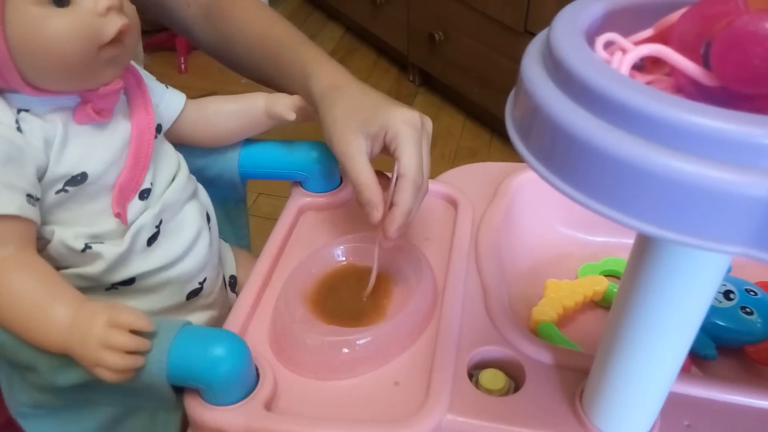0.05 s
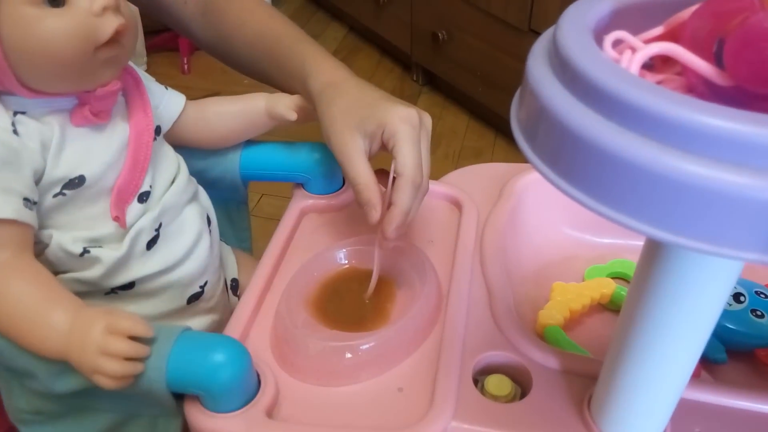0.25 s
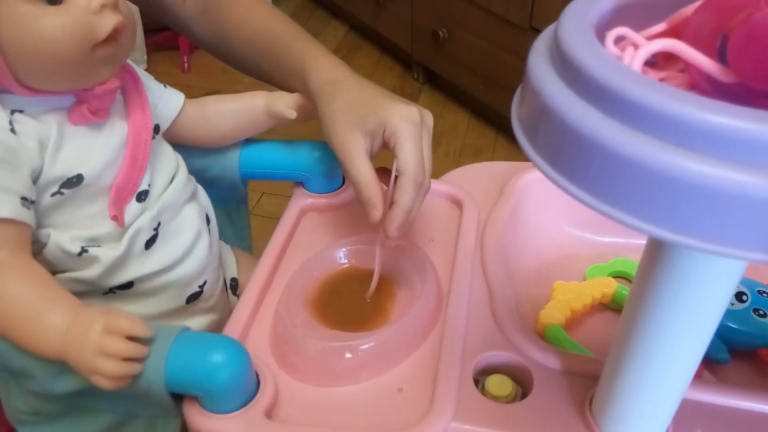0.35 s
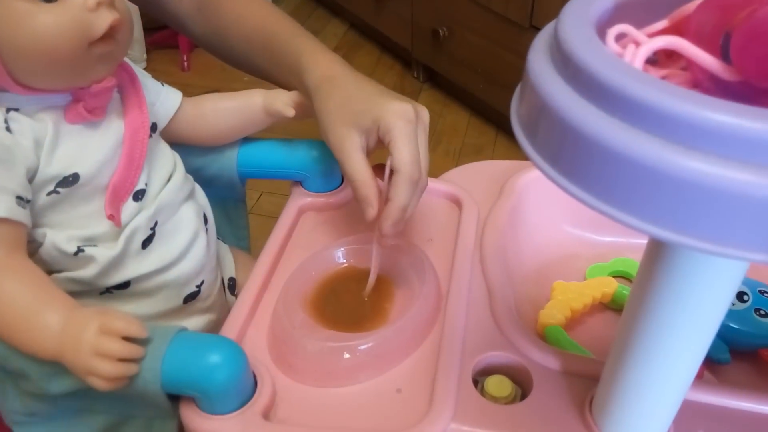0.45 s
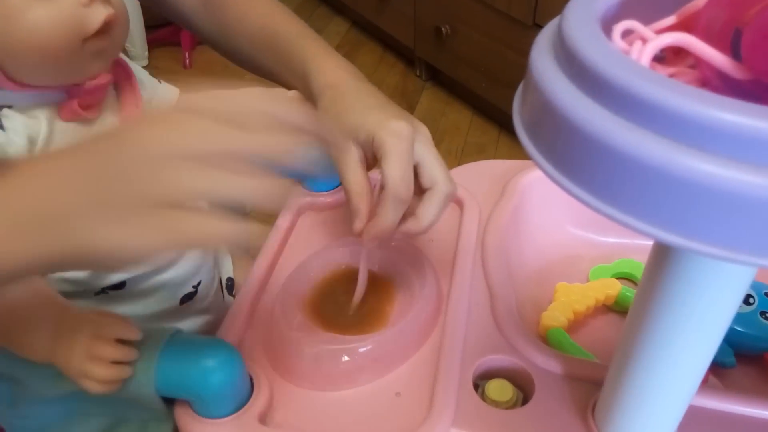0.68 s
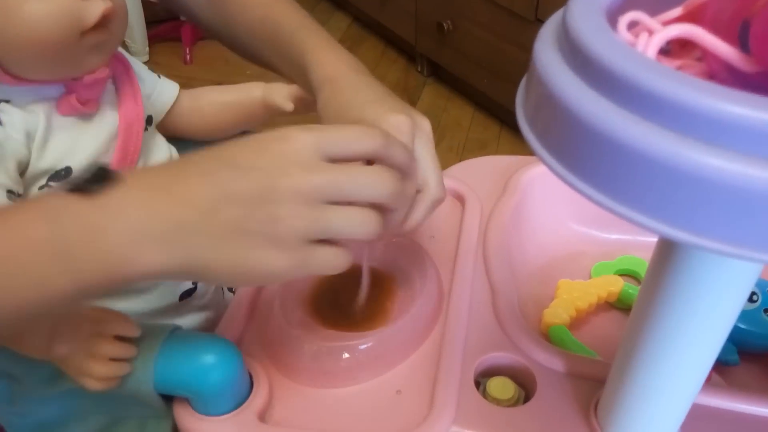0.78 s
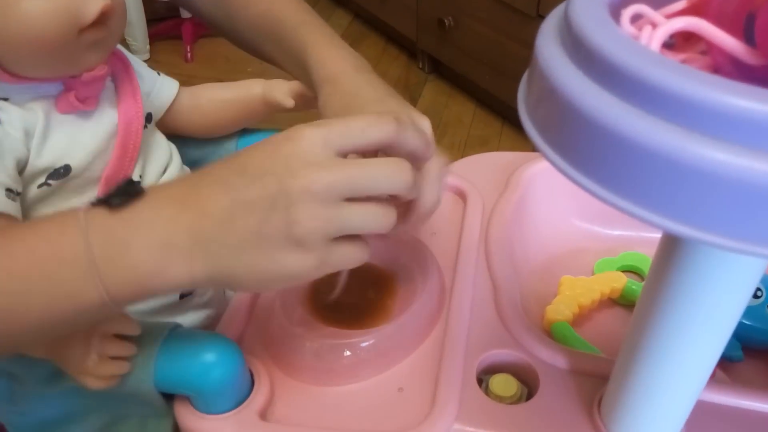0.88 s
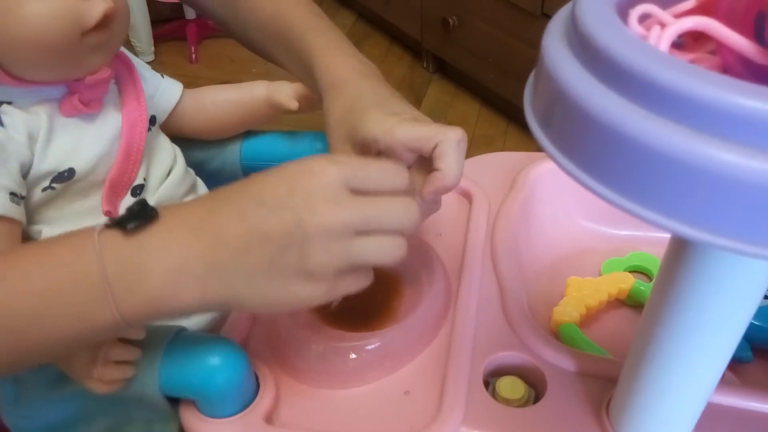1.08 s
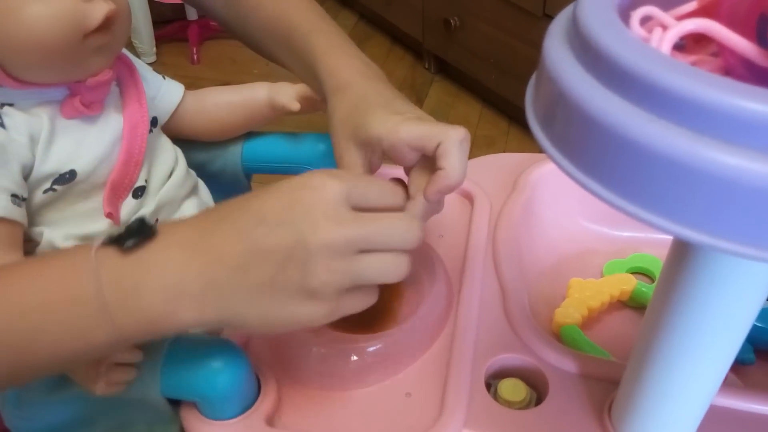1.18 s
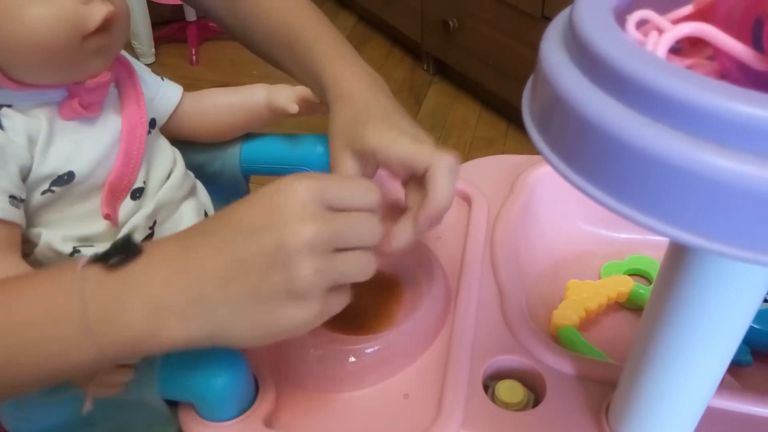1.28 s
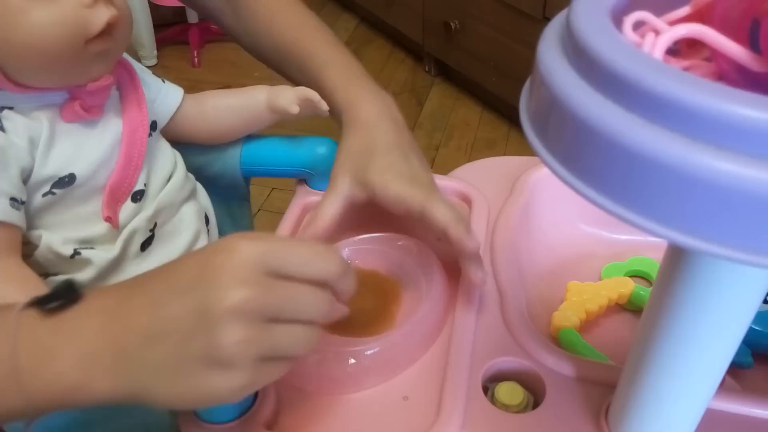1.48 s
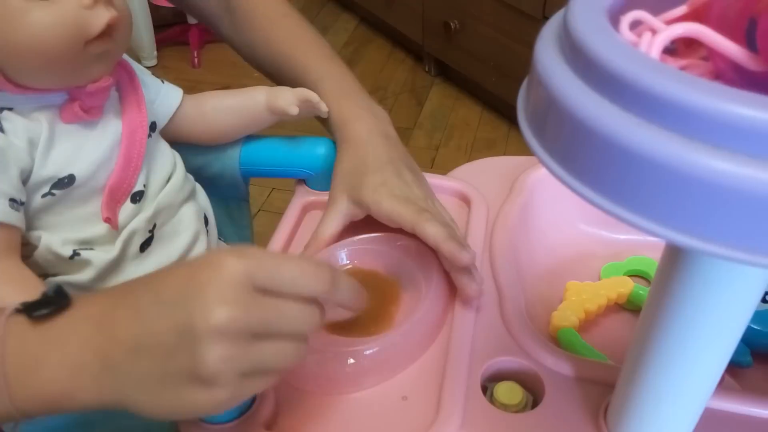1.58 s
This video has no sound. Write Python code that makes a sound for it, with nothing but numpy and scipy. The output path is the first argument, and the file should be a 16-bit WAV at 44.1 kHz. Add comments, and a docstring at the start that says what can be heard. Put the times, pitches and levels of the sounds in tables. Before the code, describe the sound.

A plastic spoon knocks in a small plastic bowl on a hollow toy table. After quiet room tone, a loud dull bump lands at 0.23 seconds, a sharp bright clack at 0.37, then weak taps around 0.5 to 0.65 and faint scrapes until 1.0. A soft microphone touch thuds left at 1.13; faint knocks and a slip follow from 1.34 to 1.65. Short room reverberation, low handling rumble, wavering hiss, thin whine.

```python
"""A plastic spoon is worked in a small plastic bowl in the tray of a hollow toy table, in a living room.
A dull bump and a sharp clack come first, then lighter knocks: damped thuds, noise cracks, ringing modes.
Soft scrapes are dense random slips that hiss and excite the bowl; a noise tail makes the room.
The hand-held microphone adds noise rumble and a touch on its left port, made of four short thuds.
Behind lie room tone, a wavering treble hiss and a thin electronic whine."""
import sys
import numpy as np
from scipy import signal
from scipy.fft import rfft, irfft
from scipy.io import wavfile

SR = 44100
rng = np.random.default_rng(int(sys.argv[2]) if len(sys.argv) > 2 else 0)


def int16_out(signal):
    """Quantize to a 16-bit WAV file."""
    q = np.round(np.clip(np.atleast_2d(signal).T, -1, 1) * 32767)
    wavfile.write(sys.argv[1], SR, q.astype(np.int16))


N = 72765
T = np.arange(N) / SR

# Room tone colour: pitch_hz, density_db (per Hz, relative)
ROOM_TONE_COLOUR = [(25, -5), (70, -5.5), (200, -5.5), (400, -13), (900, -21), (3500, -25), (4800, -24),
                    (5800, -20.5), (7000, -25.5), (8200, -35), (15000, -32.5)]
ROOM_TONE_DB, LOW_NOISE_PAN_DB = -63.5, -6   # the pan is shared with the handling rumble
# Treble hiss colour: pitch_hz, density_db (per Hz, relative)
AIR_HISS_COLOUR = [(2000, -19.5), (4000, -12), (4700, -2), (5200, -5.5), (6300, -1.5), (7200, -8.5),
                   (8000, -23.5), (12000, -36)]
# Treble hiss level over time: time_s, level_db
AIR_HISS_LEVEL = [(0, -66.5), (.12, -65.5), (.2, -69.5), (.33, -62), (.55, -80), (.7, -65.5), (.85, -70.5),
                  (1.05, -82.5), (1.3, -109.5), (1.65, -78)]
WHINE_HZ, WHINE_WANDER_HZ = 5642, 36.2
WHINE_DB, WHINE_OCTAVE_DB, WHINE_PAN_DB = -75, -82.5, -26.5

# Handling rumble colour: pitch_hz, density_db (per Hz, relative)
RUMBLE_COLOUR = [(25, -9.5), (60, 7), (110, 5.5), (200, -9), (500, -46.5), (2000, -59)]
# Handling rumble level over time: time_s, level_db
RUMBLE_LEVEL = [(0, -56.5), (.13, -54.5), (.18, -64), (.55, -53), (.67, -52.5), (.71, -63), (.87, -63.5),
                (.93, -53.5), (1.02, -64.5), (1.35, -63), (1.5, -60.5), (1.65, -56)]
# Touches on the left microphone port: start_s, level_db (before halving), pitch_hz
TOUCHES = [(1.1290, -34.5, 114.8), (1.1324, -33.5, 296), (1.135, -32, 93), (1.165, -40, 174.5)]
TOUCH_T60_S, TOUCH_PAN_DB = 0.015, 29

# Reverberation against the direct sound: pitch_hz, level_db
ROOM_LEVEL = [(60, -18), (130, -1), (250, -9), (500, -3), (1000, -7.5), (2000, -8.5), (4000, -6.5),
              (7000, -7.5)]
# Reverberation time: pitch_hz, t60_s
ROOM_T60 = [(100, 0.18), (500, 0.29), (2000, 0.35), (7000, 0.38)]
ROOM_BUILD_S = 0.002
# Left-right likeness of diffuse sound: pitch_hz, correlation (no unit)
LIKENESS = [(50, 0.55), (200, 0.43), (600, 1), (2000, 0.18), (5000, 0.29), (12000, 0.043)]

# Scrapes and brief slips of the spoon: start_s, rise_s, fall_s, hiss_db, bowl_db, pan_db (left over right)
SCRAPES = [(0.2311, .003, 0.0083, -29, -52, -2.5), (0.6256, 0.0021, 0.0041, -49.5, -71, 3),
           (0.315, 0.044, 0.027, -50, -54, -0.5), (0.737, 0.038, 0.044, -54.5, -62, -4),
           (0.881, 0.018, 0.066, -52.5, -80, 0), (0.946, 0.018, 0.039, -55.5, -68.5, -2.5),
           (1.585, .012, 0.12, -76, -62, -0.5), (1.63, 0.004, 0.066, -59, -66.5, 0)]
# Friction hiss colour: pitch_hz, density_db (per Hz, relative)
SCRAPE_COLOUR = [(700, -11.5), (1050, 0.5), (1450, -13.5), (2200, -13.5), (2700, -19.5), (4100, -9.5),
                 (4700, 3), (5200, -3.5), (6300, 6), (7200, 1), (8000, -11.5), (12000, -34.5)]
SLIPS_PER_S, SLIP_SPREAD_DB = 4900, 3.5

# Knocks: start_s, thud_db, thud_pitch_hz, thud_t60_s, tray_ring_db, bowl_clack_db,
# contact_brightness_hz, crack_db, pan_db (left over right)
KNOCKS = [ (0.2290, -7, 203, 0.0094, -25, -22, 696, -51, -5),
          (0.2327, -16.5, 435.3, 0.0098, -40.5, -17, 1600, -17.5, -4),
          (0.3688, -23, 499, 0.11, -26, -9, 6100, -12.5, -4),
          (0.3716, -17, 146.4, 0.018, -33.5, -39, 1820, -16.5, -6.5),
          (0.5074, -32.5, 152, 0.02, -47, -67, 900, -63, -7),
          (0.619, -33.5, 161.7, 0.013, -53.5, -42.5, 348, -71, -7),
          (0.6239, -43.5, 501, 0.033, -57, -60, 500, -72, -5.5),
          (0.63, -45.5, 1200, 0.019, -50, -40, 394, -48.5, -3.5),
          (0.6580, -46.5, 105, 0.035, -58.5, -63, 400, -76, -8.5),
          (0.8833, -52, 1018, 0.02, -57.5, -43.5, 405, -61, -3.5),
          (1.3420, -55, 450, 0.046, -67, -51.5, 415, -45, -9),
          (1.386, -52, 449, .1, -74, -60, 400, -78, -7),
          (1.391, -45, 218.4, 0.27, -49.5, -52, 995, -81.5, -7),
          (1.481, -45, 167.7, 0.022, -54.5, -78, 706, -64.5, -14.5),
          (1.5826, -48.5, 408, 0.028, -49.5, -46, 7000, -39, -6.5),
          (1.6352, -140, 109, .04, -52.5, -48, 4000, -49, -16)]
THUD_RISE_CYCLES = 0.89
# Dry crack of plastic on plastic: pitch_hz, density_db (per Hz, relative)
CRACK_COLOUR = [(300, -4), (1400, 5.5), (2500, -1.5), (3200, 6), (4200, -3), (5000, -0.5), (7000, -8.5),
                (9000, -3), (15000, -4.5)]
CRACK_T60_S = 0.015
CHATTER_DB, CHATTER_T60_S = -6, 0.031   # the surfaces buzz against each other just after contact
# Modes of the hollow tray: pitch_hz, level_db, t60_s
TRAY_MODES = [(109.7, -18, 1), (135.9, -10.5, 0.58), (196.56, -8, 0.13), (212.2, -4.5, .22),
              (234.8, -8, 0.35), (281.7, -10, 0.3), (368.6, -8.5, 0.17)]
TRAY_LOWEST_HZ = 95   # the small table radiates little below this
# Modes of the bowl: pitch_hz, level_db, t60_s
BOWL_MODES = [(499, -22, 0.22), (568.5, -7.5, 0.027), (711, -17, 0.036), (939, -10.5, 0.017),
              (1133, -27, 0.067), (1281, -10, 0.0272), (1656.6, -7.5, 0.026), (2011, -7, 0.012),
              (2340, -8, .014), (2845, -9.5, 0.023), (3159, -12.5, 0.023), (5114, -11.5, 0.0082),
              (5510, -28, .008), (6540, -13.5, 0.0104)]

RIGHT_LAG_S = 0.00005
MIC_TOP_HZ, MIC_TOP_LEAK_DB = 7320, -20.5
CUTOFF_HZ = 15600


def from_db(db):
    """Decibels to gain."""
    return 10 ** (np.asarray(db) / 20)


def rms_one(x):
    """Scale to unit rms."""
    return x / np.sqrt(np.mean(x ** 2) + 1e-20)


def at_hz(points, hz):
    """Read a table on a log-frequency axis."""
    table_hz, values = np.transpose(points)
    return np.interp(np.log(np.maximum(hz, 1)), np.log(table_hz), values)


def level(points):
    """A dB curve as a gain over time."""
    return from_db(np.interp(T, *np.transpose(points)))


def panned(x, pan_db):
    """Place a sound between left and right; positive leans left."""
    gains = from_db(np.array([[pan_db], [-pan_db]]) / 2)
    return x * gains / gains.mean()


def lowpass(x, hz, order):
    """Butterworth low-pass."""
    return signal.sosfilt(signal.butter(order, hz, fs=SR, output="sos"), x)


def highpass(x, hz, order=3):
    """Butterworth high-pass."""
    return signal.sosfilt(signal.butter(order, hz, "high", fs=SR, output="sos"), x)


def drift(rate_hz):
    """Slow random wander of spread 1."""
    pole = np.exp(-2 * np.pi * rate_hz / SR)
    wander = signal.lfilter([1], [1, -2 * pole, pole * pole], rng.standard_normal(2 * N))
    return rms_one(wander[N:])  # drop the filter's start-up


def coloured(x, spectrum):
    """Give a noise a spectrum; rms 1."""
    gain = from_db(at_hz(spectrum, np.arange(N // 2 + 1) * SR / N))
    return rms_one(irfft(rfft(x) * gain, N))


def diffuse():
    """White stereo noise whose left-right correlation follows the likeness table."""
    mid, side = rfft(rng.standard_normal((2, N)))
    alike = np.clip(at_hz(LIKENESS, np.arange(N // 2 + 1) * SR / N), -1, 1)
    spectra = np.sqrt(1 + alike) * mid + np.sqrt(1 - alike) * side * [[1], [-1]]
    return rms_one(irfft(spectra, N))


def dying(age, t60):
    """Exponential decay by 60 dB in each t60."""
    return np.exp(-np.log(1000) * np.minimum(age / t60, 10))


def thud(s, hz, t60):
    """A single damped swing that builds up around its first cycle; height about 1."""
    age = np.maximum(T - s, 0)
    rise = 1 - np.exp(-(age * hz / THUD_RISE_CYCLES) ** 2)
    swell = rise * dying(age, t60)
    return np.sin(2 * np.pi * hz * age) * swell / swell.max()


def ring(force, modes):
    """Drive a set of damped modes, neighbours in opposite sign."""
    out = 0
    for k, (hz, db, t60) in enumerate(modes):
        pole = from_db(-60 / (t60 * SR))
        turn = 2 * np.pi * hz / SR
        resonator = [1, -2 * pole * np.cos(turn), pole * pole]
        # the tiny offset keeps the filter away from denormal numbers
        mode = signal.lfilter([0, np.sin(turn)], resonator, force + 1e-18)
        out = out + (-1) ** k * from_db(db) * mode
    return out


def background():
    """Room tone, a wavering treble hiss and a thin electronic whine with its octave."""
    whine_hz = WHINE_HZ + WHINE_WANDER_HZ * (drift(3.2) + drift(150))
    phase = 2 * np.pi * np.cumsum(whine_hz) / SR
    whine = from_db(WHINE_DB) * rms_one(np.sin(phase))
    whine = whine + from_db(WHINE_OCTAVE_DB) * rms_one(np.sin(2 * phase))
    hiss = level(AIR_HISS_LEVEL) * coloured(diffuse(), AIR_HISS_COLOUR)
    room_tone = from_db(ROOM_TONE_DB) * coloured(diffuse(), ROOM_TONE_COLOUR)
    return panned(room_tone, LOW_NOISE_PAN_DB) + hiss + panned(whine, WHINE_PAN_DB)


def handling():
    """Low rumble of the hand-held microphone, and a finger touching its left port in short thuds."""
    touch = sum(from_db(db) * thud(s, hz, TOUCH_T60_S) for s, db, hz in TOUCHES)
    rumble = level(RUMBLE_LEVEL) * coloured(diffuse(), RUMBLE_COLOUR)
    return panned(touch / 2, TOUCH_PAN_DB) + panned(rumble, LOW_NOISE_PAN_DB)


def room(x):
    """Diffuse reverberation: a noise tail that dies band by band."""
    edges = np.geomspace(45, 11520, 17)
    noises = diffuse(), diffuse()  # neighbouring bands take turns
    tail = 0
    for k, (low, high) in enumerate(zip(edges, edges[1:])):
        hz = np.sqrt(low * high)
        band_filter = signal.butter(2, [low, high], "band", fs=SR, output="sos")
        band = signal.sosfilt(band_filter, noises[k % 2])
        band = band * dying(T, at_hz(ROOM_T60, hz)) * (1 - np.exp(-(T / ROOM_BUILD_S) ** 2))
        energy = np.mean(np.sum(band ** 2, axis=1))
        direct_energy = 2 * (high - low) / SR  # what a unit click carries in this band
        tail = tail + band * from_db(at_hz(ROOM_LEVEL, hz)) * np.sqrt(direct_energy / energy)
    return signal.fftconvolve(x, tail, axes=1)[:, :N]


def scrapes():
    """The spoon slides: dense tiny slips hiss and faintly excite the bowl."""
    happens = rng.random(N) < SLIPS_PER_S / SR
    strength = from_db(SLIP_SPREAD_DB * np.minimum(rng.exponential(1, N), 4))
    slips = happens * strength * diffuse()
    hiss = coloured(slips, SCRAPE_COLOUR)
    bowl = rms_one(ring(slips, BOWL_MODES[1:]))  # without the lowest mode
    out = 0
    for s, rise, fall, hiss_db, bowl_db, pan_db in SCRAPES:
        stroke = np.interp(T, [s, s + rise, s + rise + fall], [0, 1, 0])
        rub = from_db(hiss_db) * hiss + from_db(bowl_db) * bowl
        out = out + panned(stroke * rub, pan_db)
    return out


def knocks():
    """Each contact cracks, flexes the plastic where it lands, sets the tray ringing and makes the bowl clack."""
    direct, on_tray, on_bowl = 0, 0, 0
    crackle = coloured(diffuse(), CRACK_COLOUR)
    for s, thud_db, thud_hz, thud_t60, tray_db, bowl_db, bright_hz, crack_db, pan_db in KNOCKS:
        click = 1. * (np.arange(N) == int(s * SR))
        after, age = T >= s, np.abs(T - s)
        chatter = diffuse() * after * dying(age, CHATTER_T60_S)
        # chatter energy is set against that of the click
        chatter *= from_db(CHATTER_DB) / np.sqrt(np.sum(chatter ** 2) / 2)
        crack = lowpass(crackle * after * dying(age, CRACK_T60_S), bright_hz, order=1)
        flex = from_db(thud_db) * thud(s, thud_hz, thud_t60)
        bowl_hit = lowpass(click + chatter, bright_hz, order=1)
        direct = direct + panned(flex + from_db(crack_db) * crack, pan_db)
        on_tray = on_tray + panned(from_db(tray_db) * click, pan_db)
        on_bowl = on_bowl + panned(from_db(bowl_db) * bowl_hit, pan_db)
    return highpass(direct + ring(on_tray, TRAY_MODES) + ring(on_bowl, BOWL_MODES), TRAY_LOWEST_HZ)


def scene():
    """Spoon, bowl and tray in the room, a little nearer the left port of a microphone with a dull top."""
    left, right = knocks() + scrapes()
    direct = np.array([left, np.interp(T - RIGHT_LAG_S, T, right)])
    heard = direct + room(direct)
    dulled = lowpass(heard, MIC_TOP_HZ, order=12) + from_db(MIC_TOP_LEAK_DB) * heard
    return dulled + handling() + background()


def record(dry):
    """A steep elliptic low-pass cuts the top."""
    return signal.sosfilt(signal.ellip(10, .1, 80, CUTOFF_HZ, fs=SR, output="sos"), dry)


dry = scene()
out = record(dry)
int16_out(out)
```